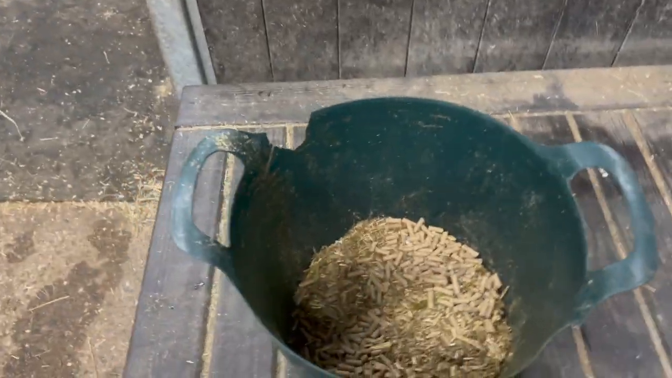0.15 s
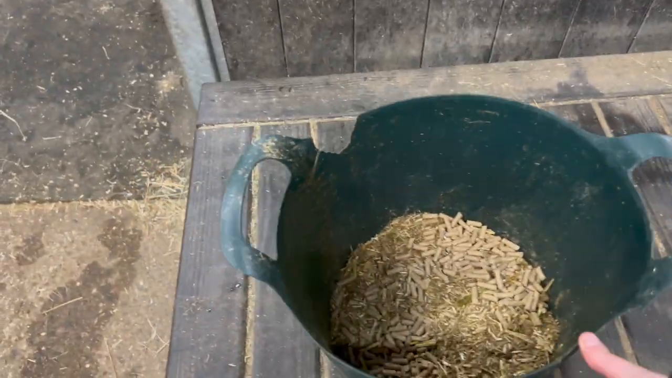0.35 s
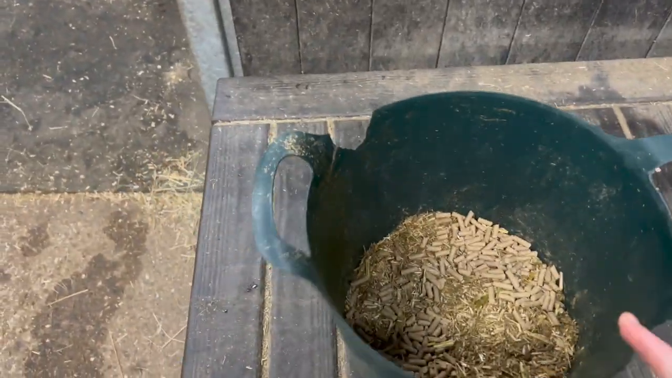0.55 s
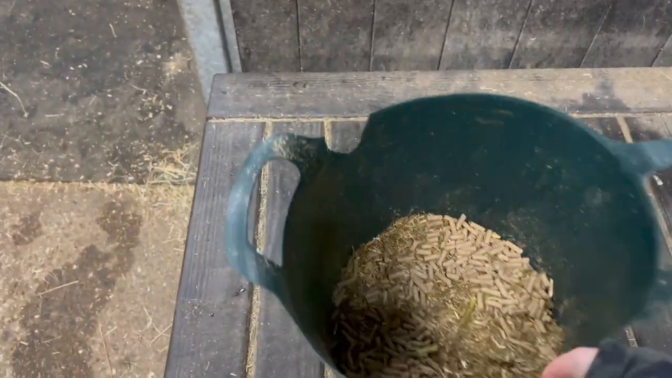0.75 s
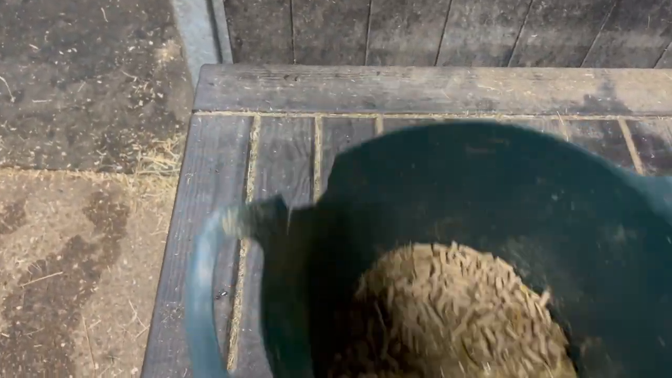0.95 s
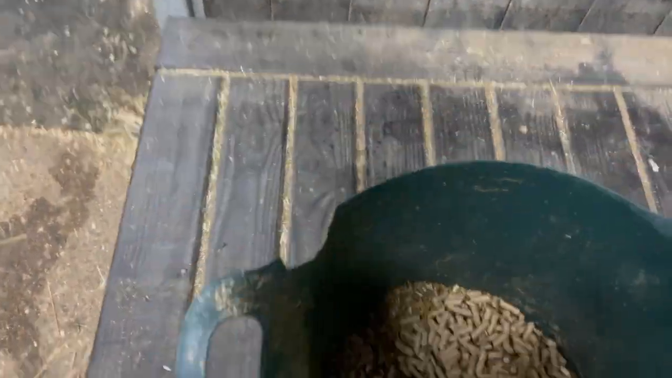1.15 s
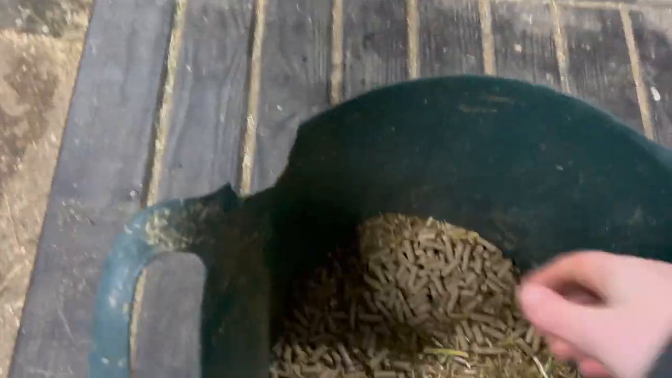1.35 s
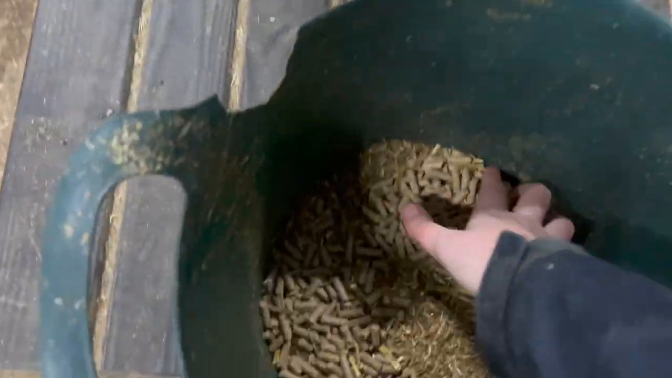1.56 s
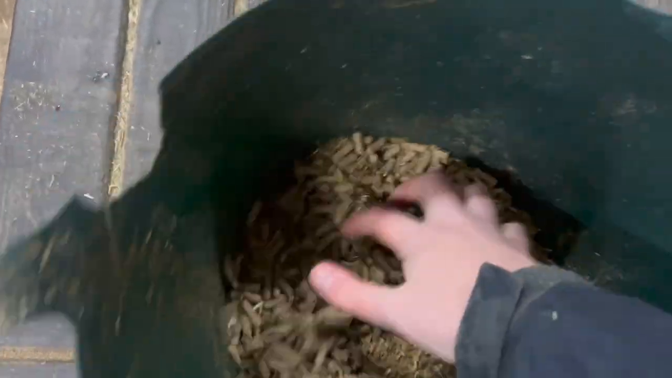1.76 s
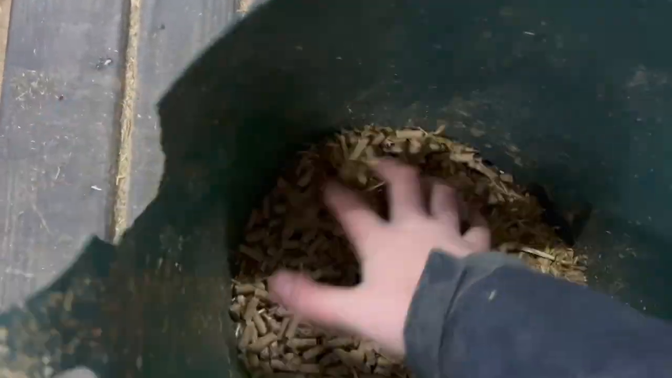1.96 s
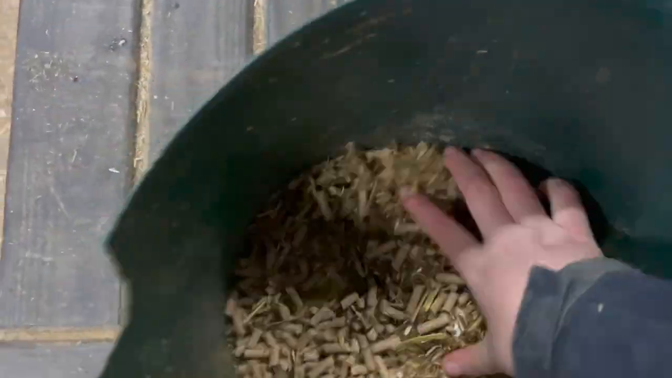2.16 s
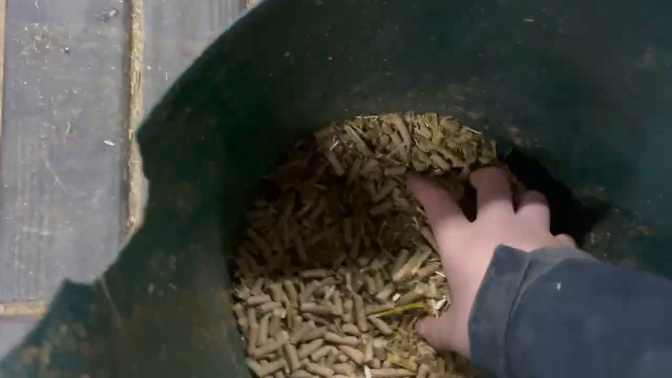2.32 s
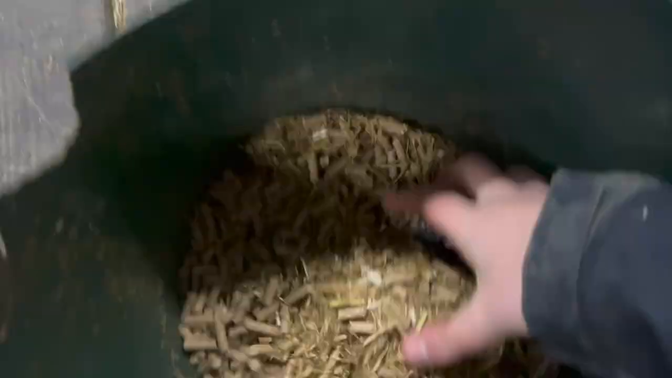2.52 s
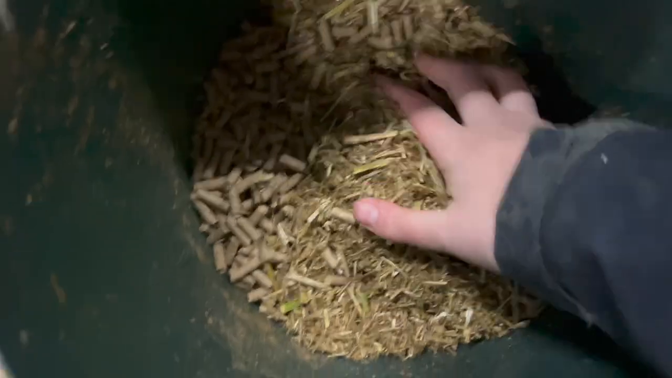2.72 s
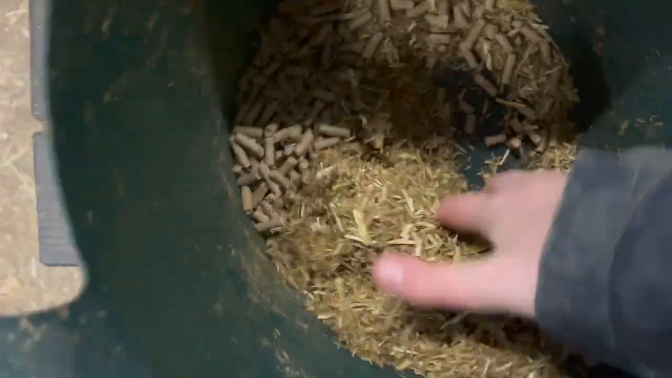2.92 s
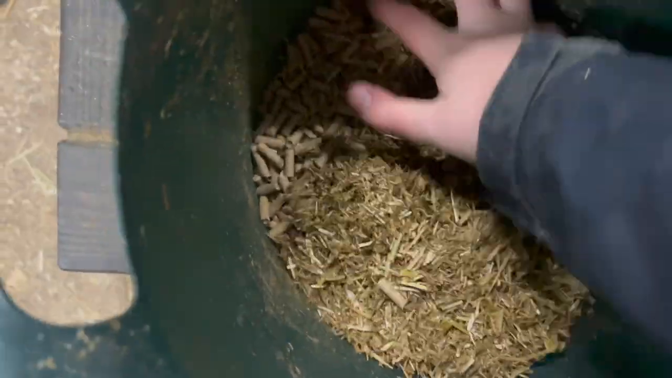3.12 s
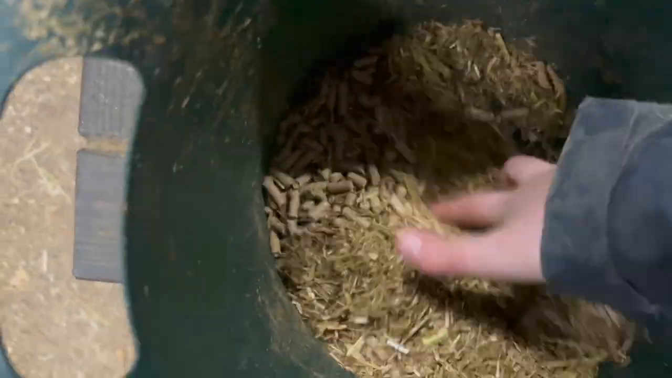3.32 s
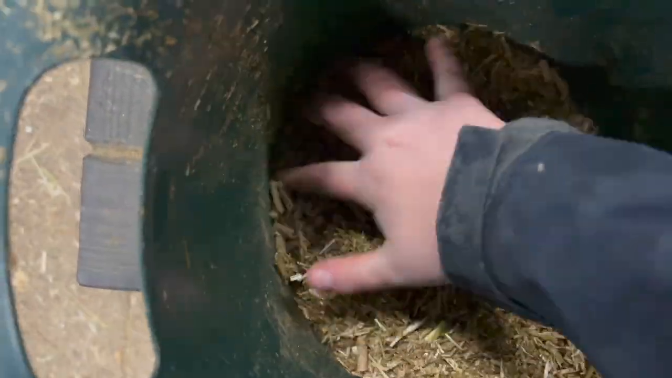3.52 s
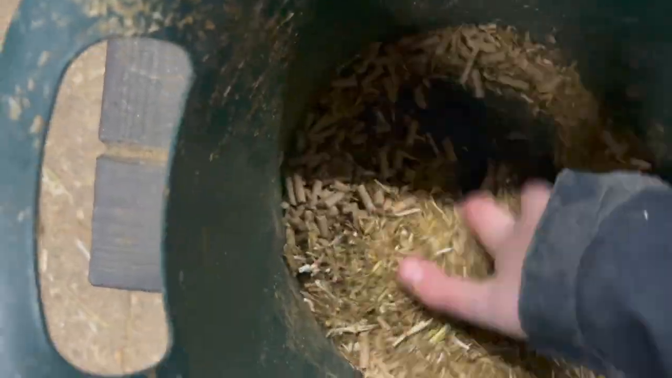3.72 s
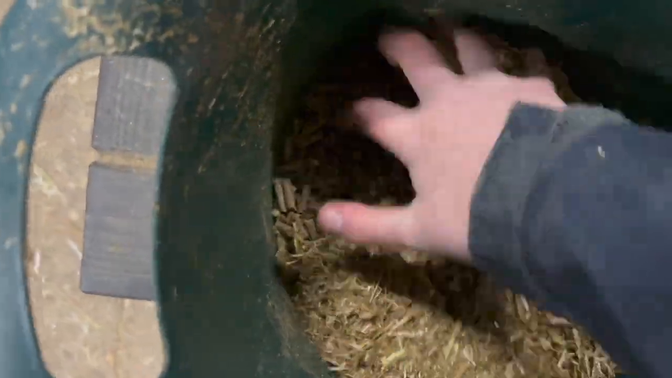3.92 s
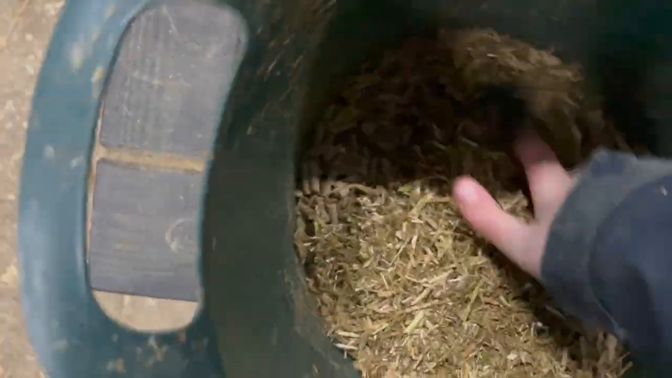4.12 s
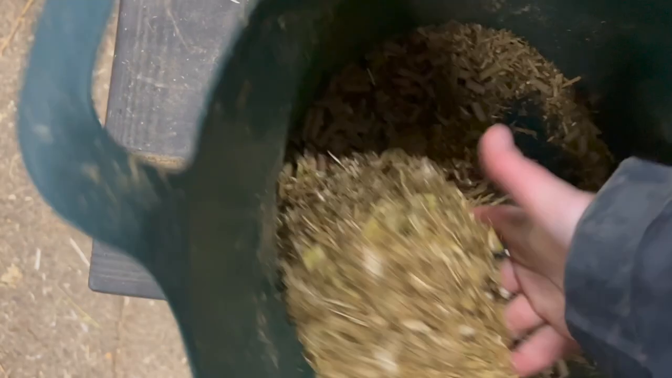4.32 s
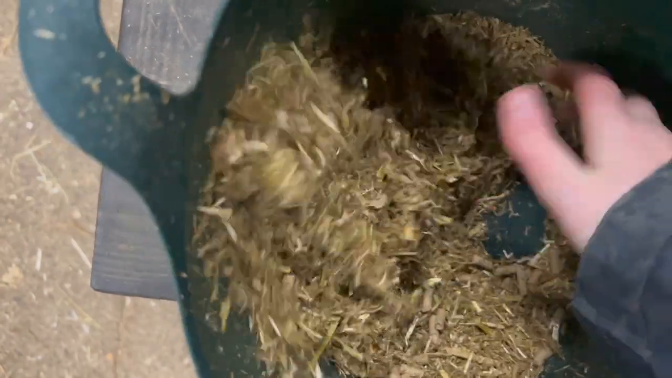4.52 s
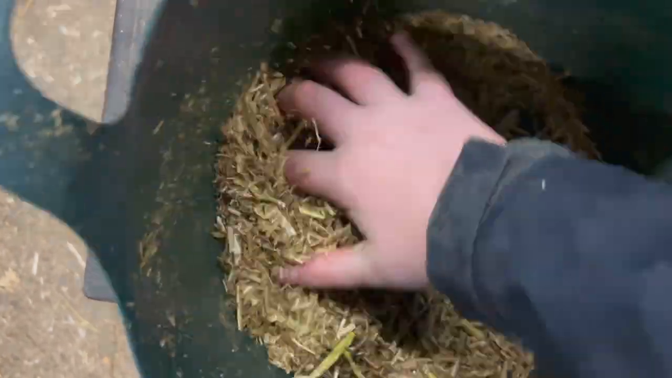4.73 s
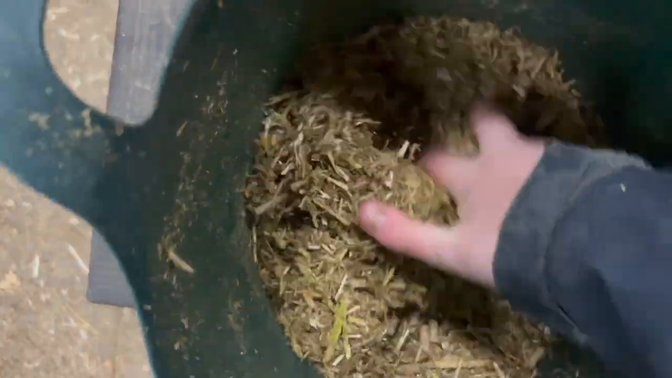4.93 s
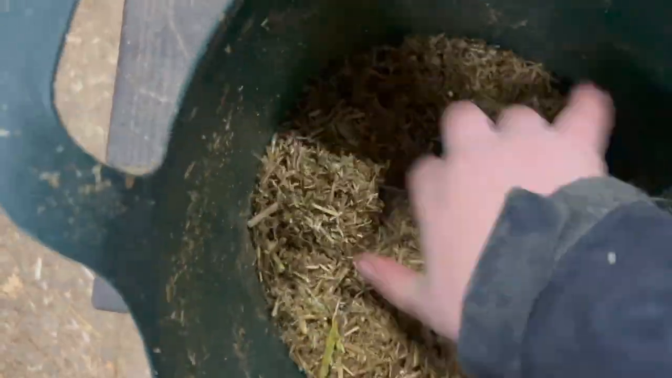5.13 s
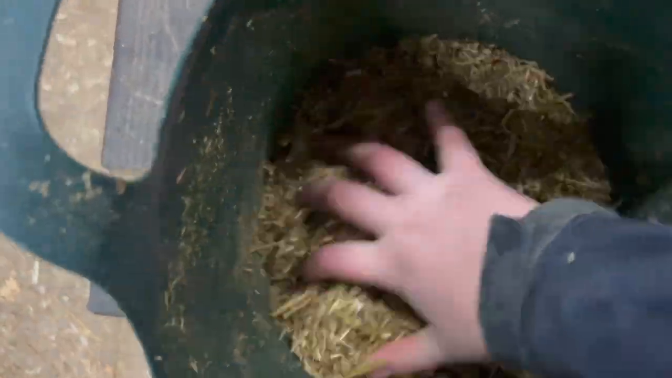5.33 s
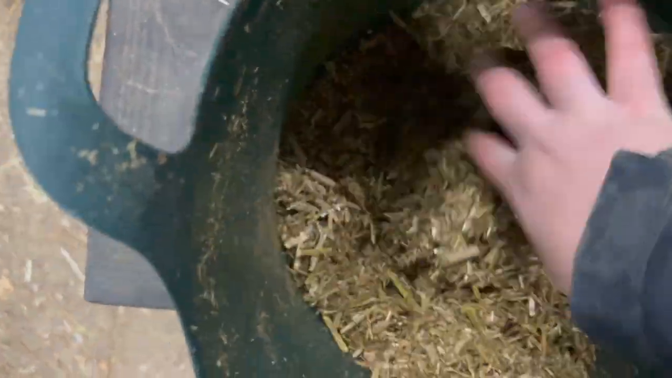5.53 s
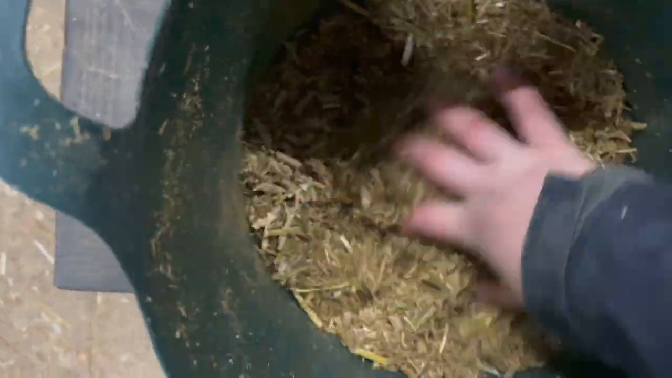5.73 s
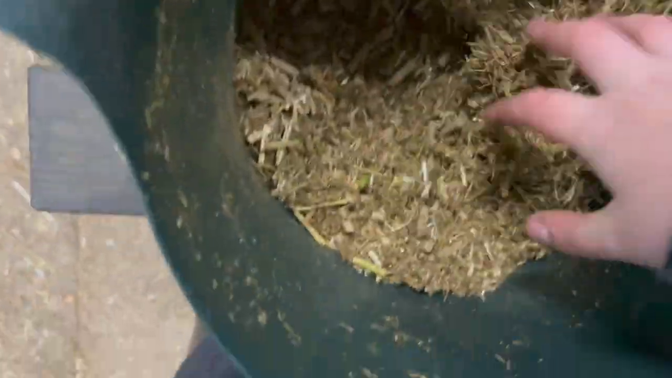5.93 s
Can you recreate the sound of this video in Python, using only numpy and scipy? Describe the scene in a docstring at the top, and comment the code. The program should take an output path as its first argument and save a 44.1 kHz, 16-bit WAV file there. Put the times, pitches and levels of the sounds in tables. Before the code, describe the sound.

A close, dry stereo sound just above the rim of a soft plastic tub in a quiet stable with faint steady air. From 0 to 0.9 s there is only light sleeve and chaff rustle with low rumble. At about 1.0 s the tub drops on wooden boards: a sharp, deep thump with a burst of hard pellet knocks, and a smaller bump at 1.1. A short lull follows. From 1.4 s a hand digs in; pellets clatter densely from 1.7 to 2.2, then strokes swell at 2.3, 2.7, 3.1, 3.5 and 3.9-4.1, each rattling, rustling and scraping, with dull tub bumps and snapping stalks. It thins near 4.3, with a crisp snap at 4.45. The strongest, brightest swish comes at 4.8, followed by scattered knocks and softer strokes at 5.1-5.4, and fading chaff rustles from 5.6 until it ends at about 6 s.

```python
"""Stirring dry feed in a tub

A soft plastic tub of dry pellets and chaff is set down on boards, then a hand stirs the feed in it.
Pellets are short rings and rattling clicks; chaff, a sleeve and snapping stalks are shaped noise.
Tub, its floor and the boards are sets of dying sines, struck or pushed by the feed and its weight.
Two close microphone ports hear it from just above the rim, over the faint noise of a quiet stable.
"""
import sys
import numpy as np
from scipy import signal
from scipy.fft import rfft, irfft
from scipy.io import wavfile
from scipy.ndimage import uniform_filter1d

SR = 44100
rng = np.random.default_rng(int(sys.argv[2]) if len(sys.argv) > 2 else 0)


def unload_audio(sound):
    """Save the sound as a 16-bit wav file, at the path given as the first command line argument."""
    columns = np.transpose(np.atleast_2d(sound))
    # keep every value between -1 and 1, then stretch to whole-number steps
    steps = np.round(np.clip(columns, -1, 1) * 32767)
    wavfile.write(sys.argv[1], SR, steps.astype(np.int16))


N = 267731

# how the floor of the tub rings: (f/Hz, width/Hz, level/dB)
FLOOR_MODES = [(560, 60, -18.5), (878, 146, -14.5), (923, 161, 2.5), (1059, 250, 9)]
# how the boards ring: (f/Hz, width/Hz, level/dB)
BOARD_MODES = [(67.1, 6.7, -3), (81.7, 25.5, 8), (112.3, 12.3, 1.5), (134, 41, -9.5)]
RATTLE, RUSTLE, WEIGHT, SCRAPE = range(4)  # the layers that follow the strokes of the hand


def stroke_gain(layer):
    """One layer through all strokes of the hand: it swells in, changes, dies away and never quite stops."""
    # strokes of hand and sleeve: (start t/s, length/s, pellet rattle level/dB,
    # chaff and sleeve rustle level/dB, weight on the tub level/dB, scrape on its floor level/dB)
    strokes = [(0.074, 0.26, -54, -39.5, -52, -50), (0.41, 0.066, -52, -45.5, -40.5, -46),
               (0.613, 0.64, -45.5, -44.5, -48.5, -46), (0.96, .16, -37.5, -43.5, -32, -34.5),
               (1.211, 0.14, -47.5, -40.5, -58, -51), (1.324, 0.12, -47, -37.5, -54, -45),
               (1.383, 0.31, -37.5, -39.5, -39, -40.5), (1.668, 0.16, -33, -37.5, -39, -35.5),
               (1.834, 0.14, -36.5, -39, -38, -33), (1.93, 0.15, -33, -38, -34, -31.5),
               (2.074, 0.12, -31, -36, -33.5, -35.5), (2.209, 0.11, -34, -41, -40, -33),
               (2.285, 0.084, -24.5, -34, -34.5, -28), (2.343, 0.08, -31, -34.5, -31, -31),
               (2.434, 0.17, -34, -38, -33, -37), (2.653, 0.14, -28.5, -28.5, -27.5, -27.5),
               (2.81, 0.083, -38, -43, -33.5, -41), (2.894, 0.21, -46, -40.5, -39.5, -41.5),
               (3.003, 0.1, -38, -39.5, -37.5, -35), (3.113, 0.15, -29.5, -31, -32, -31.5),
               (3.317, 0.044, -37.5, -40, -39, -44), (3.413, 0.12, -35, -40, -37, -38),
               (3.504, .18, -29, -30.5, -32.5, -29.5), (3.683, .05, -28.5, -55, -29.5, -27),
               (3.763, 0.058, -38, -52, -34, -45), (3.864, 0.14, -28.5, -34, -35.5, -33),
               (3.99, .15, -28, -29.5, -33.5, -30.5), (4.172, 0.13, -39, -37.5, -41, -36),
               (4.31, 0.13, -41, -42, -59, -60), (4.427, 0.072, -42, -40, -43.5, -56),
               (4.565, 0.23, -37, -38.5, -39, -34), (4.748, 0.08, -26.5, -37, -34, -34),
               (4.807, 0.08, -21, -26.5, -33, -23), (4.871, 0.1, -29, -34, -31, -30.5),
               (5.06, 0.13, -45.5, -46, -41.5, -44), (5.132, 0.11, -37.5, -36, -33.5, -39),
               (5.269, 0.19, -33.5, -34.5, -34, -35.5), (5.633, 0.095, -38, -34, -39.5, -35.5),
               (5.742, 0.1, -75, -35, -40.5, -43.5), (5.972, 0.13, -45, -36, -41.5, -44)]
    # one row for each layer, in that order: (attack/s, swell from start to end/dB, release/dB per s, rest level/dB)
    follow = [(0.06, -2.5, 242, -72), (0.053, -0.5, 308, -49.5), (0.046, 1, 183, -55),
              (0.057, 1.5, 236, -84)]
    attack_s, swell_db, release_db, rest_db = follow[layer]
    frames = np.arange(0, N / SR + .01, .002)
    start, length, db = np.array(strokes).T[[0, 1, 2 + layer], :, None]
    t = frames - start
    swell = swell_db * (np.clip(t / length, 0, 1) - 1)
    release = release_db * np.maximum(t - length, 0)
    power = (np.clip(t / attack_s, 0, 1) * gain_of(db + swell - release)) ** 2
    rounded = uniform_filter1d(power.sum(0), size=9)  # rounds the corners
    return np.interp(np.arange(N) / SR, frames, np.sqrt(rounded + gain_of(rest_db) ** 2))


def pellet_knocks():
    """Single pellets strike the wall: lesser ones by chance, the loudest at set times."""
    # the loudest strikes: (peak t/s, level at the left port/dB, f/Hz, lean to the left/dB)
    loudest = [(.7311, -19, 1080, 1), (.7761, -18, 1380, 6), (0.8913, -12, 1360, 1),
               (0.9221, -9.5, 1420, 6), (.9555, -16, 1400, 10), (0.9664, -23, 1570, 5),
               (0.9832, 1, 1060, -6.5), (0.992, -1, 960, 11), (1.0014, 2, 1010, 5), (1.013, 0, 1490, 1),
               (1.0255, -5.5, 1400, 1), (1.1008, -5.5, 1047, 2), (1.4222, -12, 1510, -2),
               (1.457, -7.5, 1540, 4), (1.5328, -19, 1630, 2), (1.5467, -9, 1670, -1),
               (1.575, -13.5, 1470, -1), (1.6295, -8, 1490, 5), (1.6705, -5, 1280, -2),
               (1.7043, -8, 1290, 5), (1.7138, 3.5, 1340, 18), (1.7175, -7, 1550, 6), (1.734, -5, 1300, 8),
               (1.7505, -2, 1430, 16), (1.755, 0.5, 1380, -4.5), (1.7598, -5, 2370, -6),
               (1.7677, 2.5, 1300, 11), (1.7756, 3.5, 1370, 1), (1.778, -10, 1310, 5),
               (1.7841, -2, 1400, 2), (1.78, -14, 1410, 7), (1.7973, -10, 1300, 13), (1.8332, -14, 840, -1),
               (1.9174, -13.5, 1630, 2), (1.9569, 0.5, 1270, 4), (1.971, -2.5, 1290, 5),
               (1.9838, 0, 1450, 12), (2.0036, 0.5, 1380, -2), (2.0274, 0.5, 1420, 7),
               (2.0597, -13, 1210, 5), (2.083, -9, 1430, 4), (2.095, -12, 1140, -10),
               (2.1219, 8.5, 1510, 9), (2.126, 3, 1530, 0), (2.1376, -10, 1320, 2), (2.141, -9, 1630, 3),
               (2.1457, -3.5, 1530, -2), (2.1488, -4, 1400, 3), (2.1776, -3.5, 1590, 4),
               (2.326, -6.5, 1950, 17), (2.3332, -5, 915, -5), (2.391, -5, 1940, 16),
               (2.5088, -5.5, 1510, 3), (2.517, -17, 1410, -6), (2.535, -12, 1240, -2),
               (2.6065, 4, 1110, 0.5), (2.6957, -10, 1640, 6), (2.708, -4.5, 1300, 12),
               (2.716, -13, 1500, 2), (2.7437, -8, 1650, 11), (2.8166, -15, 1290, 7),
               (2.8486, -1.5, 1330, 15), (2.852, -1, 1360, 6), (3.0255, -2.5, 1660, 0),
               (3.0303, -15, 1170, 12), (3.0377, -9, 1230, -10), (3.043, 4, 1060, -3.5),
               (3.0463, -2, 1610, 13), (3.07, -13, 1460, 6), (3.1845, -10.5, 2300, -4),
               (3.2053, -11, 1980, 5), (3.3063, -5.5, 1340, 14), (3.3331, -10, 1230, -1),
               (3.3455, 1.5, 1800, 17), (3.3557, -0.5, 1550, 0), (3.397, -6.5, 1410, 3),
               (3.442, -3.5, 1610, 1), (3.5322, 2.5, 1180, -6), (3.5657, -2, 1570, -3),
               (3.5786, -6, 1570, -5), (3.5971, 1.5, 1600, -1), (3.6118, -3.5, 2000, -2),
               (3.6178, -8, 1200, 6), (3.6282, -3, 1440, 0), (3.6679, -7.5, 1220, -10),
               (3.674, -6, 1500, 18), (3.6768, -0.5, 2050, -2.5), (3.719, -7, 1280, -5),
               (3.7903, -9.5, 1150, -1), (3.8213, -15, 1090, -3), (3.8714, -3.5, 1420, 2),
               (3.901, 7.5, 1280, -2.5), (3.9165, -14, 1280, 1), (3.9535, -11, 1220, -3),
               (4.0768, -9.5, 1500, -5), (4.0839, -4, 1510, -1), (4.0904, -3, 1860, 12),
               (4.1101, -6, 1290, 7), (4.142, -6.5, 1500, -2), (4.285, -13.5, 1290, 2),
               (4.321, -11.5, 1350, 2), (4.459, -5, 1160, 13), (4.467, -16, 1060, 0),
               (4.6218, -13, 1100, 3), (4.7227, -5.5, 1470, -1), (4.8, -3, 1820, -1), (4.85, -5, 1260, 7),
               (4.8983, -5.5, 1030, -2), (4.9208, 0, 920, 4), (4.927, -12, 1700, 8.5),
               (4.9328, -8, 1110, -9), (4.9701, -3, 1530, -4), (5.088, -13, 1010, -1),
               (5.1627, -16, 1190, -4), (5.2534, -2.5, 1330, -1.5), (5.3471, -13, 915, -3),
               (5.3914, -9, 1320, -4), (5.423, -6, 1050, 0), (5.438, -10, 1670, 1), (5.4431, -2.5, 1650, 3),
               (5.4466, -8, 1310, 16), (5.6813, -14.5, 1420, -6), (5.6867, -10, 1530, -6),
               (5.7021, -10, 2080, 7), (5.7056, -17, 2200, -1)]
    return knocks([*small_knocks(), *loudest])


def small_knocks(count=300, over_db=10.5, spread_db=10.5, low_hz=910, high_hz=2060, mean_lean_db=-7):
    """Rows of lesser knocks at chance times, their levels following the rattle at that moment."""
    when, size, pitch, side = rng.random((count, 4)).T
    s = .01 + when * (N / SR - .02)
    rattle_db = 20 * np.log10(stroke_gain(RATTLE)[(s * SR).astype(int)])
    db = rattle_db + over_db + spread_db * (2 * size - 1)
    hz = low_hz * (high_hz / low_hz) ** pitch
    return list(zip(s, db, hz, 2 * mean_lean_db * side))


def knocks(rows, rise_ms=0.24, right_db=0.5, tail_db=-3.5, tail_s=0.006, floor_db=-6.0):
    """Each blow is a short ring, followed by a weak scatter of reflections inside the tub."""
    cycles, soft_cycles_per_db = 0.93, 0.0332  # cycles to fall 8 dB; blows below 0 dB ring longer
    out, t = np.zeros((2, N)), np.arange(-80, 420) / SR
    draws = rng.random((len(rows), 2))
    scatter = rng.standard_normal((len(rows), 2, 700))
    for (s, db, hz, lean_db), draw, taps in zip(rows, draws, scatter):
        # the right port hears another phase
        phase = 2 * np.pi * (draw[0] + np.array([[0], [draw[1] - .4]]))
        fall_ms = 1000 * (cycles + soft_cycles_per_db * max(-db, 0)) / hz
        level = gain_of([[db], [db - lean_db + right_db]])
        direct = level * blow(hz, rise_ms, fall_ms, phase, t)
        taps = taps * np.exp(-np.arange(700) / SR / tail_s)
        taps = gain_of(tail_db) * taps / np.linalg.norm(taps, axis=1, keepdims=True)
        add(out, s + t[0], direct)
        add(out, s + t[0] + 0.001507, signal.fftconvolve(direct, taps, axes=1))
    # every blow also rings the floor of the tub
    floor = body(FLOOR_MODES, 0.0014, size=900)
    rung = signal.oaconvolve(out.mean(0), floor / abs(rfft(floor)).max())[:N]
    return above(out + gain_of(floor_db) * rung, 754.0)


def blow(hz, rise_ms, fall_ms, phase, t):
    """A ring of a few cycles whose envelope peaks at t = 0 and falls 8 dB in each fall time."""
    ms = 1000 * t
    rise = np.exp(-(ms / rise_ms) ** 2)
    fall = gain_of(-8 * np.maximum(ms, 0) / np.clip(fall_ms, .3, 20))
    return np.where(t < 0, rise, fall) * np.cos(2 * np.pi * hz * t + phase)


def pellet_rattle():
    """Tumbling pellets ring in a few broad bands of pitch."""
    # how pellets ring: (f/Hz, width/Hz, level/dB)
    pellet_modes = [(1420, 360, -2.5), (1752, 335, 8), (2187, 410, 7.5), (2684, 130, -15.5),
                    (4000, 920, -3)]
    return rattle(pellet_modes, RATTLE)


def floor_scrape():
    """Pellets scraped over the floor of the tub make it ring."""
    return rattle(FLOOR_MODES, SCRAPE, count=8, scatter=0.075)


def rattle(modes, layer, count=16, per_s=130, spread_db=2.0, scatter=0.1, uneven_db=15.0):
    """Pellets tumble at many places; each place rings the modes unevenly, and differently at each port."""
    out = np.zeros((2, N))
    for place in range(count):
        train = clicks(per_s, spread_db)
        shift = 1 + scatter * rng.uniform(-1, 1, len(modes))  # each place has its own pitches
        for port in out:
            uneven = [(hz * k, width, db + uneven_db * rng.uniform(-1, 1))
                      for (hz, width, db), k in zip(modes, shift)]
            struck = evened(body(uneven, 0.0002, size=600))
            heard = signal.oaconvolve(train, struck)[:N]
            port += np.roll(heard, rng.integers(20))  # a delay of less than 20 samples
    return stroke_gain(layer) * evened(above(out, 600.0))


def rustle(per_s=5000, spread_db=4.5, hiss=1.0, clump_db=1.0):
    """Chaff and sleeve crackle in clumps over a fine hiss; each port hears other reflections of the crackle."""
    # sound of the chaff: (f/Hz, level per Hz/dB)
    chaff_spectrum = [(2500, -7.5), (3500, -17), (4600, -7.5), (5700, -2.5), (7000, -7.5), (8500, -9.5),
                      (10500, -14.5), (13000, -16.5), (15000, -25.5), (16000, -16)]
    crackle = clicks(per_s, spread_db)
    paths = rng.standard_normal((2, 120)) * np.exp(-np.arange(120) / 24.7)
    heard = signal.oaconvolve(crackle[None], paths, axes=1)[:, :N]
    clumps = evened(uniform_filter1d(rng.standard_normal(N), 500))
    mix = evened(heard) + hiss * rng.standard_normal((2, N))
    mix = mix * gain_of(clump_db * clumps)
    return stroke_gain(RUSTLE) * evened(coloured(mix, chaff_spectrum))


def snaps(fall_s=0.0038, rise_s=0.00041, right_db=6.5):
    """Dry stalks and pellet edges snap: noise that starts quickly and dies within milliseconds."""
    # the snaps: (t/s, level/dB, lean to the left/dB)
    snap_rows = [(0.435, -32, 14), (0.785, -32, -6), (.9223, -26.5, 9), (0.982, -22.5, 9), (.999, -14, 6),
                 (1.108, -38, -2), (1.519, -34, -5), (1.634, -29, -2), (1.666, -22.5, -2),
                 (1.713, -13.5, 1), (1.721, -17.5, 11), (1.7314, -13.5, -2), (1.753, -13.5, 7),
                 (1.958, -20, -2), (2.003, -18.5, 4), (2.0264, -26, -1), (2.1255, -16, 1),
                 (2.6046, -20, 8.5), (2.745, -28, 1), (2.792, -15.5, 10), (2.8498, -12.5, 2.5),
                 (3.033, -24, 13), (3.049, -24, 10), (3.1817, -25, 3), (3.332, -37, -8), (3.347, -25, 13),
                 (3.396, -20, 9.5), (3.4424, -29, 4), (3.5308, -18, 11), (3.661, -17, 11),
                 (3.6754, -17, 17), (3.823, -30, 5), (3.879, -23, 6), (3.9, -11, 8.5), (3.954, -34, 4),
                 (4.064, -18, 5), (4.4536, -8, 2), (4.7226, -24, 10), (4.797, -33, -3), (4.931, -13.5, 6.5),
                 (4.969, -19, 13.5), (5.164, -21.5, 6), (5.392, -38, 0), (5.422, -27, 2),
                 (5.4304, -19, 9.5), (5.7083, -23.5, 3)]
    # sound of a snap: (f/Hz, level per Hz/dB)
    snap_spectrum = [(1800, 10), (2600, 5), (4000, -0.5), (5700, 5.5), (8000, -9), (11000, -11.5),
                     (16000, -30)]
    out, t = np.zeros((2, N)), np.arange(900) / SR
    shape = np.exp(-t / fall_s) * (1 - np.exp(-t / rise_s))
    noises = rng.standard_normal((len(snap_rows), 2, 900))
    for (s, db, lean_db), noise in zip(snap_rows, noises):
        sides = gain_of([[lean_db / 2], [right_db - lean_db / 2]])
        add(out, s, gain_of(db) * noise * shape * sides)
    return coloured(out, snap_spectrum)


def tub_bumps(rise_ms=1.54, fall_ms=4.5):
    """Hand and feed bump dully against the tub: each bump is a low ring of a few cycles."""
    # the bumps: (peak t/s, level/dB, f/Hz)
    bump_rows = [(0.456, -28, 278), (0.733, -26, 241), (.987, -8.5, 276), (1.02, -9.5, 228),
                 (1.108, -27.5, 177), (1.767, -14.5, 338), (1.793, -20, 247), (2.018, -20, 280),
                 (2.086, -15.5, 284), (2.104, -15.5, 276), (2.357, -20.5, 258), (2.512, -21.5, 332),
                 (2.552, -8.5, 242), (2.61, -20.5, 360), (2.737, -16, 281), (2.751, -16.5, 237),
                 (2.798, -17, 310), (3.05, -14, 270), (3.166, -21, 234), (3.535, -7.5, 270),
                 (3.565, -13.5, 217), (3.74, -16.5, 293), (3.924, -16, 255), (3.951, -16, 278),
                 (4.145, -21, 236), (4.725, -20.5, 268), (4.864, -14.5, 260), (4.88, -16.5, 278),
                 (4.936, -16.5, 245), (5.093, -17, 277), (5.258, -20, 277), (5.315, -18.5, 260),
                 (5.375, -17, 248), (5.43, -16, 273), (5.481, -21.5, 260), (5.687, -24.5, 252),
                 (5.719, -22, 274)]
    out, t = np.zeros((1, N)), np.arange(-400, 2000) / SR
    for (s, db, hz), draw in zip(bump_rows, rng.random(len(bump_rows))):
        add(out, s + t[0], gain_of(db) * blow(hz, rise_ms, fall_ms, 2 * np.pi * draw, t)[None])
    return heard_apart(out[0])


def board_thuds():
    """Weight lands on the boards, which are pushed down and ring."""
    # the landings: (t/s, level/dB)
    thud_rows = [(0.302, -32), (0.489, -33), (0.678, -25), (0.75, -28), (0.991, -11), (1.011, -2.5),
                 (1.114, -13.5), (1.554, -25), (1.785, -21), (1.925, -20.5), (2.019, -23), (2.094, -18.5),
                 (2.358, -20.5), (2.544, -17), (2.727, -16.5), (3.168, -20.5), (3.549, -18), (3.599, -16.5),
                 (3.909, -38), (4.014, -25), (4.771, -19.5), (4.864, -18.5), (4.959, -26), (5.275, -25),
                 (5.369, -19), (5.862, -32)]
    out = np.zeros((1, N))
    boards = body(BOARD_MODES, 0.0041, size=14000)
    for s, db in thud_rows:
        add(out, s, -gain_of(db) * boards[None] / boards.max())
    return heard_apart(out[0])


def heard_apart(x, apart=0.072, lag_s=0.00073):
    """Makes the two ports differ slightly by a weak late copy, added at the left and taken off at the right."""
    other = apart * np.roll(x, round(lag_s * SR))
    return np.array([x + other, x - other])


def tub_rumble():
    """The weight of the moving feed makes the tub boom dully with each stroke."""
    # air and wall of the tub: (f/Hz, width/Hz, level/dB)
    tub_modes = [(185.6, 70, -4), (263.5, 91, 4), (293, 74, -7)]
    return stroke_gain(WEIGHT) * rumble(tub_modes)


def board_rumble():
    """The shifting load keeps the boards rumbling, now louder, now softer."""
    # rumble of the boards over time: (t/s, level/dB)
    load_points = [(0, -51), (.27, -54), (.33, -37), (.42, -48.5), (.55, -37), (.62, -40), (.75, -37),
                   (.86, -52), (1.05, -48), (1.2, -28.5), (1.3, -37), (1.42, -44.5), (1.93, -38),
                   (2.25, -43), (2.52, -35.5), (2.9, -35.5), (3.0, -46.5), (3.2, -39), (3.38, -56),
                   (3.65, -45), (4.18, -38), (4.41, -45), (4.55, -53), (4.65, -36.5), (4.82, -37),
                   (5.1, -46), (5.36, -33), (5.55, -51), (5.8, -38), (6.07, -43)]
    s, db = np.transpose(load_points)
    return gain_of(np.interp(np.arange(N) / SR, s, db)) * rumble(BOARD_MODES)


def rumble(modes, per_s=150, spread_db=0.5, apart=0.1):
    """The moving feed pushes a body in lumps, heard nearly alike at both ports."""
    pushes = np.array([clicks(per_s, spread_db), clicks(per_s, spread_db)])
    pushed = body(modes, 0.0013, size=9000)
    both, other = signal.oaconvolve(pushes, pushed[None], axes=1)[:, :N]
    return evened(np.array([both + apart * other, both - apart * other]))


def stable_air(level_db=-44.5):
    """The still air of the stable: steady shaped noise, independent at each port."""
    # sound of the air: (f/Hz, level per Hz/dB)
    air_spectrum = [(30, -8), (66, -6), (300, -8), (570, -8), (1000, -8), (2000, -7), (3400, -16.5),
                    (6000, -23), (9000, -20), (16000, -68)]
    return gain_of(level_db) * evened(coloured(rng.standard_normal((2, N)), air_spectrum))


def gain_of(db):
    """Turns dB into a gain."""
    return 10 ** (np.asarray(db) / 20)


def evened(x):
    """Scales a sound to rms 1."""
    return x / np.sqrt(np.mean(x ** 2) + 1e-20)


def read(points, hz):
    """Reads a curve between its points on a log-frequency axis."""
    f, value = np.transpose(points)
    return np.interp(np.log(hz + 1), np.log(f + 1), value)


def add(mix, s, sound):
    """Adds a sound to the mix at time s."""
    part = mix[:, round(s * SR):][:, :sound.shape[1]]
    part += sound[:, :part.shape[1]]


def ring(hz, width, rise_s, size):
    """A dying sine with a soft start; the wider its resonance, the sooner it dies."""
    t = np.arange(size) / SR
    return np.sin(2 * np.pi * hz * t) * np.exp(-np.pi * width * t) * (1 - np.exp(-t / rise_s))


def body(modes, rise_s, size):
    """All modes of a thing struck once."""
    return sum(gain_of(db) * ring(hz, width, rise_s, size) for hz, width, db in modes)


def clicks(per_s, spread_db):
    """Clicks of random sign at chance times; a few are large."""
    when, size, sign = rng.random((3, N))
    level = gain_of(spread_db * np.minimum(-np.log(1 - size), 4))
    return (when < per_s / SR) * level * np.sign(sign - .5)


def coloured(x, points):
    """Gives both ports a spectrum that falls away below its first point."""
    hz = np.fft.rfftfreq(N, 1 / SR)
    bass_fall = np.minimum(hz / points[0][0], 1) ** 2
    return irfft(rfft(x) * gain_of(read(points, hz)) * bass_fall, N)


def above(x, hz):
    """High-pass that looks only at the past."""
    return signal.sosfilt(signal.butter(2, hz, "high", fs=SR, output="sos"), x)


def scene():
    """Feed, tub, boards and the quiet stable together."""
    feed = pellet_knocks() + pellet_rattle() + floor_scrape() + rustle() + snaps()
    low = tub_bumps() + board_thuds() + tub_rumble() + board_rumble()
    return feed + low + stable_air()


def record(dry):
    """Mixes some of the left channel into the right above 300 Hz, shades the right; soft ceiling, treble limit."""
    # likeness of the two channels by frequency, alternating in steps from 10 to 16 kHz
    # as lossy coding leaves it: (f/Hz, likeness from 0 to 1)
    likeness_points = [(300, .97), (700, .7), (1000, .3), (7000, .1), (9000, .6), (10000, .97), (11000, .8),
                       (12000, .97), (13000, .8), (14000, .97), (15000, .8), (16000, .97)]
    # the right port is turned away: (f/Hz, level/dB)
    shade = [(400, 0.5), (800, -2), (1300, -8.5), (2200, -6), (3400, -4), (5700, -10.5), (8000, -5.5),
             (9500, -4), (16000, 3.5)]
    lead_s, edge_hz, ceiling = .00025, 15850, .92
    hz = np.fft.rfftfreq(N, 1 / SR)
    left, right = rfft(dry)
    likeness = np.clip(read(likeness_points, hz), 0, 1)
    # above 2 kHz the part taken from the left comes earlier in the right channel
    lead = np.exp(2j * np.pi * hz * lead_s * (hz > 2000))
    mixed = likeness * lead * left + np.sqrt(1 - likeness ** 2) * right
    right = np.where(hz < 300, right, mixed) * gain_of(read(shade, hz))
    ports = np.array([dry[0], irfft(right, N)])
    ports = above(above(ports, 40.0), 40.0)  # small capsules lose the deep bass
    held = ports / (1 + abs(ports / ceiling) ** 4) ** .25
    limit = signal.firwin(511, edge_hz, window=("kaiser", 9), fs=SR)
    return signal.oaconvolve(held, limit[None], "same")


dry = scene()
out = record(dry)
unload_audio(out)
```